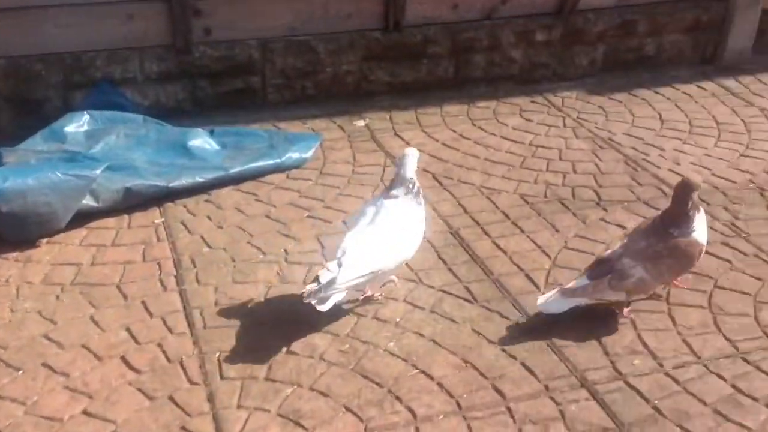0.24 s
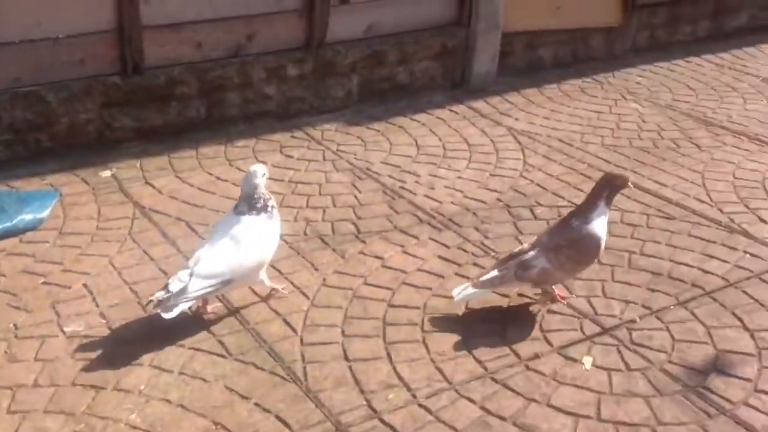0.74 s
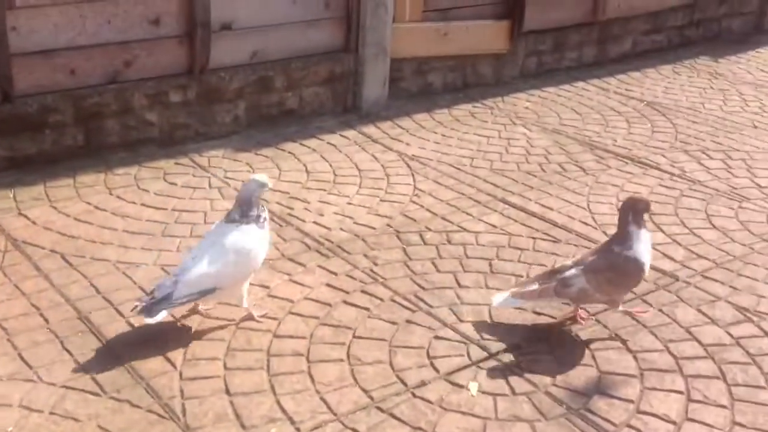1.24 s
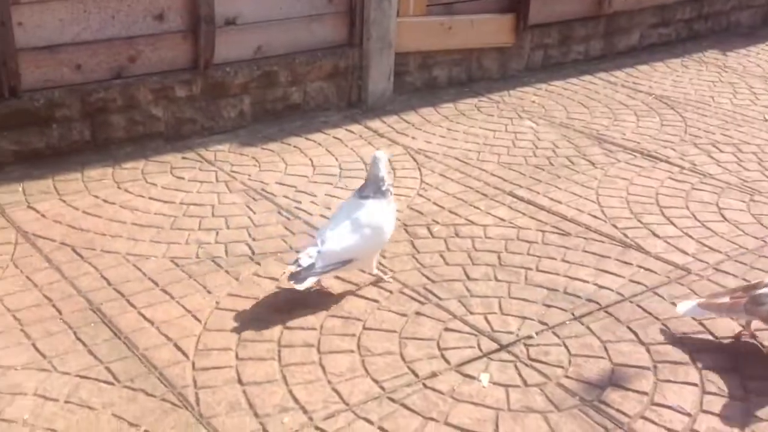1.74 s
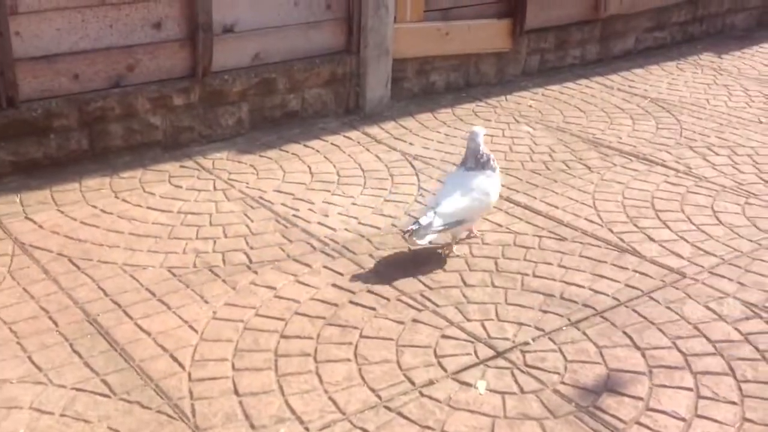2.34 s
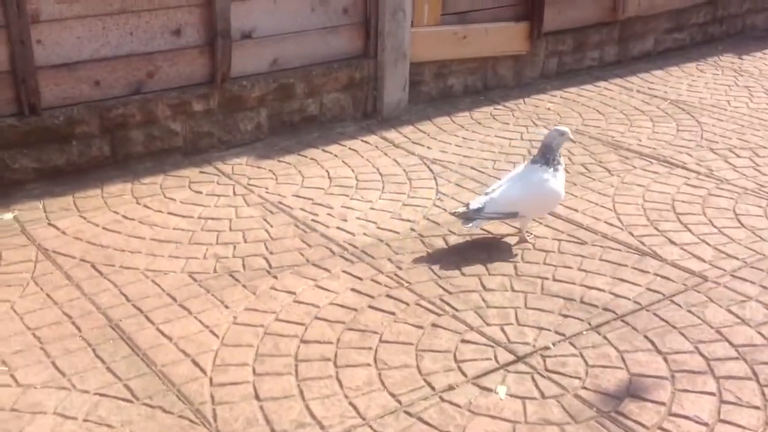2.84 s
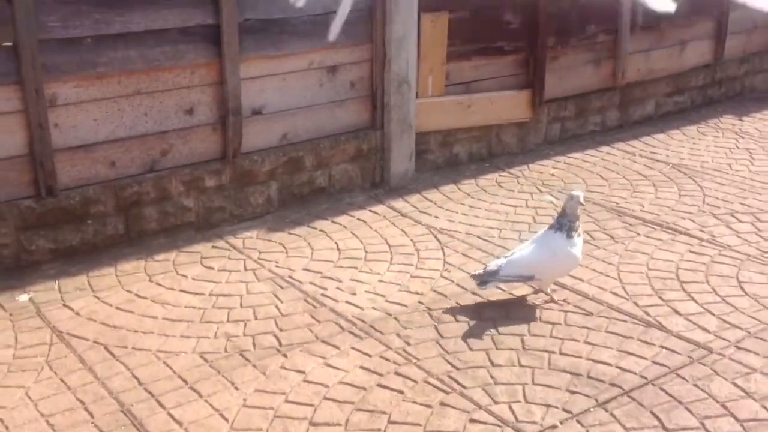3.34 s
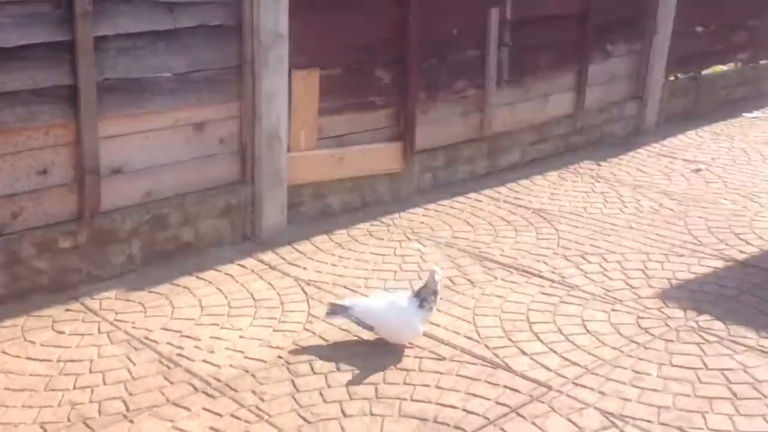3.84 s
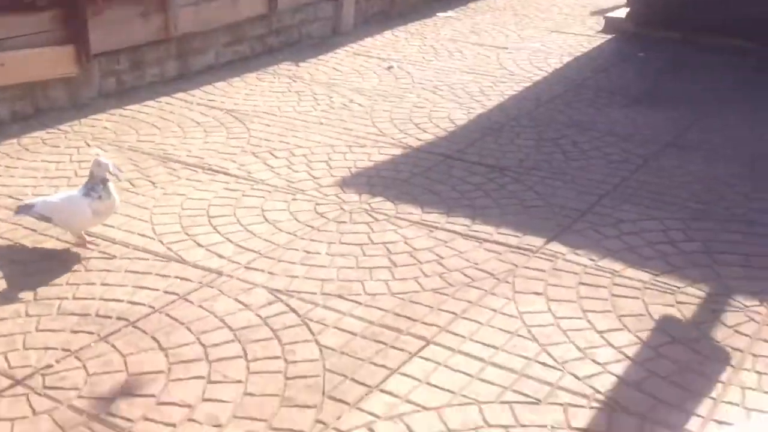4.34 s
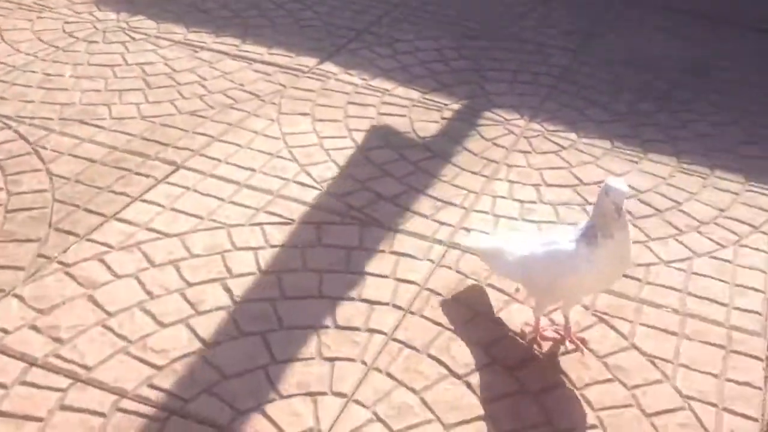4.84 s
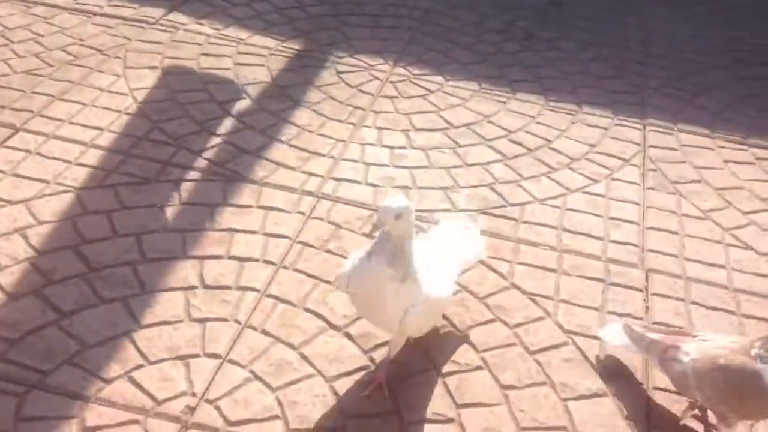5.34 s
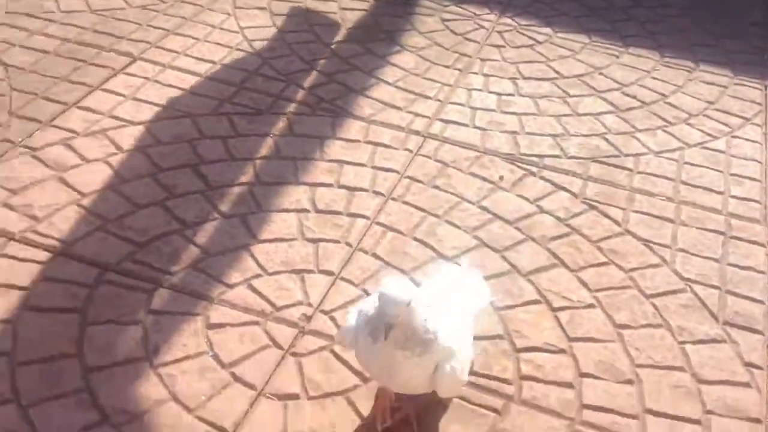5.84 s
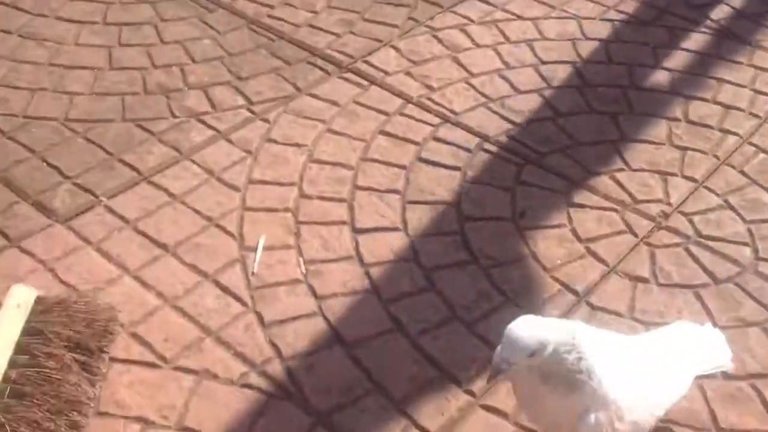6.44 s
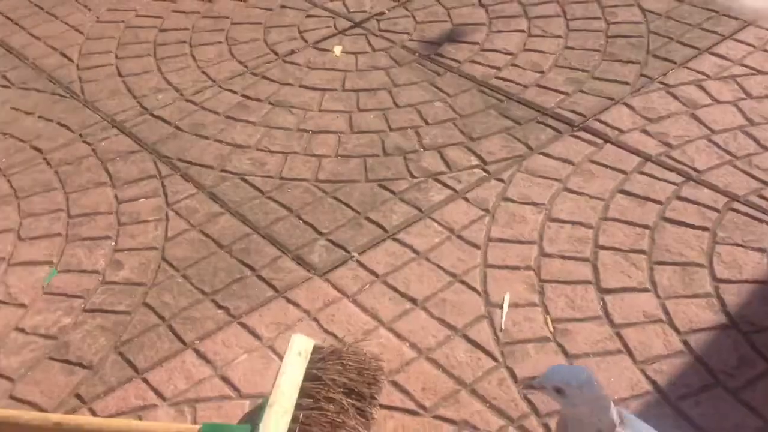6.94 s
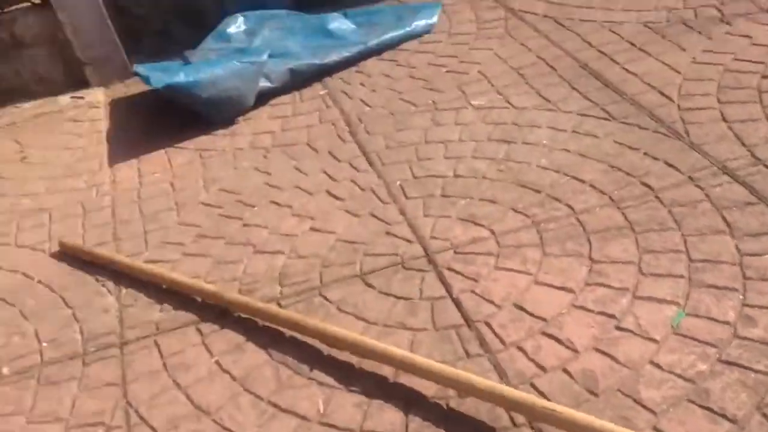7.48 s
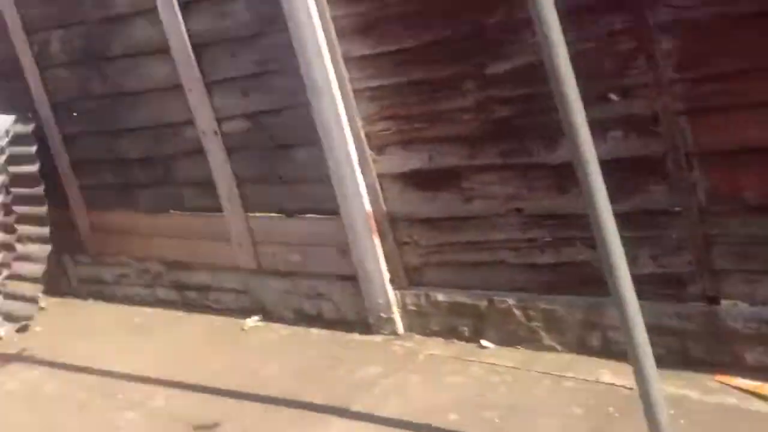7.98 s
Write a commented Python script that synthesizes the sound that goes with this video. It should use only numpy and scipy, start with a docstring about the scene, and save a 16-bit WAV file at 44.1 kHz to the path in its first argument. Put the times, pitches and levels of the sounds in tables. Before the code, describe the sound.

Low, steady traffic lies behind tiny, dry claw ticks on paving. A pigeon flaps up close, with papery slaps, breathy whistling downstrokes and soft puffs of air. After a calm gap with sparse ticks, another takes off with a scrabble, loud cracking claps and low wind thumps on the handheld microphone, then a thin wing whir and a dull wooden landing knock. Short outdoor echoes from paving and fence.

```python
"""Over far traffic hum, filtered noise, a soft swish dies away within the first second in a paved, fenced yard.
Claws tick on the paving as brief decaying sines; then pigeons fly up close to a handheld microphone.
Wings clap as noise bursts with low pops, downstrokes whistle and hiss, upstrokes push low puffs of air.
Claws tick again before a second flight, which scuffles, claps harder and later adds a fluttering wing whir.
Last, a bird's feet knock on a wooden loft, a sum of damped modes; sparse echoes follow the near sounds."""
import sys
import numpy as np
from scipy import signal
from scipy.fft import rfft, irfft
from scipy.io import wavfile
from scipy.ndimage import uniform_filter1d

SR = 44100
rng = np.random.default_rng(int(sys.argv[2]) if len(sys.argv) > 2 else 0)


def bounce(signal):
    """Save signal as a 16-bit WAV file at the path given by the first command-line argument."""
    frames = np.transpose(np.atleast_2d(signal))
    limited = np.clip(frames, -1, 1)
    pcm = np.round(limited * 32767).astype(np.int16)
    wavfile.write(sys.argv[1], SR, pcm)


N = 362061  # length [samples]

# Spectra give relative density: (frequency [Hz], level [dB per Hz]).
# Far traffic: its course (time [s], level [dB]) and its spectrum
HUM_LEVEL = [(0.0, -57), (2.52, -58), (3.84, -53.5), (4.32, -58), (5.78, -59), (6.35, -55.5), (6.97, -57.5),
             (8.21, -57.5)]
TRAFFIC_SPECTRUM = [(15, -75), (25, -44), (92, -22.5), (146, -0.5), (205, -2), (282, -2), (405, -6),
                    (485, -3), (816, -4.5), (1640, -16), (2010, -19), (3000, -37.5), (3900, -36),
                    (6600, -120)]
# Microphone hiss: spectrum, and overall level [dB]
HISS_SPECTRUM = [(1470, -27), (2500, -4), (3660, -6), (8230, -7.5), (9880, -15), (14600, -4.5),
                 (15500, -14)]
HISS_DB = -71.5
# Smooth swish further off: (time [s], level [dB]), and its spectrum
SWISH_LEVEL = [(0.0, -69.5), (0.19, -65), (0.356, -67.5), (0.508, -63), (0.73, -74), (0.95, -87)]
SWISH_SPECTRUM = [(1180, -27), (2000, -6), (2330, -5), (4790, -2), (11800, -9), (15500, -15)]
# Air from the wings buffeting the microphone, one curve per flight: (time [s], level [dB]); and its spectrum
BUFFET_LEVELS = [
    [(2.45, -79), (2.656, -57), (3.85, -75), (4.026, -56), (4.144, -82)],
    [(5.7, -67), (6.06, -48.5), (6.11, -72), (6.94, -52.5), (7.11, -57), (8.05, -73), (8.13, -60),
     (8.21, -71)],
]
BUFFET_SPECTRUM = [(20, -56), (60, -21.5), (130, -2.5), (220, -4.0), (400, -26)]
# Claws on the paving, about five steps a second: (time [s], greatest strike level [dB])
CLAW_STEPS = [(0.7083, -43), (0.7966, -50), (0.9487, -47), (1.1454, -51), (1.3613, -44), (1.575, -44),
              (1.7654, -42), (1.9639, -41), (2.135, -47), (2.2777, -43), (2.3885, -47), (4.3949, -52),
              (4.696, -39.5), (4.9192, -48), (5.366, -41.5), (5.462, -47), (5.5976, -43), (5.6206, -48)]
# Feet on the loft boards: (mode frequency [Hz], level [dB], decay by 60 dB [s])
BOARD_MODES = [(242, -35, 0.18), (354, -34, .04), (1560, -38.5, 0.036)]
KNOCK_S = 8.1675
# Feathers rustling between the beats, one curve per flight: (time [s], level [dB]); and the feather spectrum
RUSTLE_LEVELS = [
    [(2.38, -75), (2.52, -51), (3.02, -55), (4.01, -53), (4.2, -58), (4.39, -64), (4.6, -75)],
    [(5.67, -70), (5.74, -50.5), (5.88, -56), (5.97, -41.5), (6.11, -48.5), (6.14, -51.5), (6.64, -52),
     (6.94, -47), (7.37, -50), (8.03, -52), (8.21, -45)],
]
FEATHER_SPECTRUM = [(150, -20), (400, 2.5), (900, 2), (1600, -0.5), (2500, -2.5), (4700, -4.5), (7700, -3),
                    (11000, -6), (14500, -5), (15500, -1.5)]
# Pushes of air on upstrokes and on landing: (centre time [s], level [dB], mid frequency [Hz])
PUFFS = [(2.593, -44, 332), (2.715, -45.5, 344), (2.811, -47.5, 400), (2.852, -48.5, 381),
         (2.965, -47.5, 408), (3.1, -48, 359), (3.292, -49.5, 279), (3.378, -50, 367), (3.522, -48, 377),
         (3.593, -46.5, 398), (3.653, -45.5, 354), (3.778, -48.5, 330), (3.851, -41, 365),
         (3.935, -45, 334), (4.009, -50.5, 210), (4.081, -51.5, 373), (4.154, -49.5, 292),
         (5.987, -38, 333), (6.416, -47, 273), (6.511, -38.5, 313), (6.758, -40, 394), (6.823, -50, 320),
         (6.875, -37.5, 300), (6.991, -43, 350), (7.104, -43, 372), (7.22, -34, 376), (7.337, -46, 287),
         (7.588, -48, 300), (8.186, -39, 236)]
# Harder pushes are shorter: (level [dB], width at half height [ms])
PUFF_WIDTH = [(-50, 22), (-32.5, 13.17)]
# Scrabbling and fluttering on the spot, quick runs of puffs:
# (start [s], end [s], greatest level [dB], lowest mid frequency [Hz], highest mid frequency [Hz])
SCUFFLES = [(5.935, 6.098, -41, 260, 670), (8.115, 8.161, -40, 256, 470)]
SCUFFLE_GAP_S, SCUFFLE_WIDTH_MS = .009, 8.35
# Thin, fluttering wing whistle running under the late beats: (time [s], level [dB]), and its spectrum
WHIR_LEVEL = [(7.28, -73), (7.4, -62), (7.65, -56), (8.0, -63), (8.08, -62)]
WHIR_SPECTRUM = [(480, -40), (660, 3), (780, -1), (1000, -35)]
# Downstrokes: (centre time [s], whistle level [dB], reference whistle frequency [Hz],
# width of the basic swell at half height [ms], feather hiss level [dB])
STROKES = [(2.546, -48, 751, 45, -48), (2.668, -45, 773, 48, -43), (2.8, -42.5, 723, 53, -45),
           (2.937, -43, 743, 54, -43), (3.08, -41, 751, 54, -42), (3.222, -44.5, 624, 47, -43.5),
           (3.37, -44, 654, 58, -45), (3.508, -47.5, 687, 58, -44.5), (3.662, -49, 671, 44, -48),
           (3.794, -48, 680.5, 50, -50.5), (4.081, -51, 568, 44, -58), (5.771, -57.5, 733, 76, -66),
           (5.908, -52.5, 752, 35, -62), (5.993, -42, 630, 22, -43), (6.04, -52, 711, 34, -50),
           (6.085, -55, 620, 26, -53), (6.34, -58, 726, 90, -81), (6.468, -54.5, 730, 58, -63),
           (6.59, -49, 708, 38, -85), (6.716, -52, 661, 41, -48), (6.831, -47, 722, 50, -49.5),
           (6.952, -44.5, 740, 21, -47.5), (7.076, -44.5, 647, 33, -44.5), (7.185, -66, 635, 31, -44),
           (7.3, -58, 716, 40, -51), (7.41, -58, 750, 50, -60), (7.534, -49.5, 739, 43, -70),
           (7.647, -49, 684, 35, -53), (7.77, -57, 813, 51, -60), (7.898, -50.5, 692, 33, -63),
           (7.979, -54.5, 647, 70, -59), (8.11, -45.5, 656, 53, -49), (8.137, -44, 718, 46, -44)]
# Faster air whistles higher and richer: (whistle frequency [Hz], overtones against the whistle [dB])
OVERTONE_LAW = [(600, -12.5), (750, -2.5)]
# Overtones gain as hiss nears the whistle: (hiss against whistle [dB], overtone change [dB])
AIRY_LAW = [(-38, -10), (4.5, -4.5)]
WHOOSH_SPECTRUM = [(120, -44), (350, 7), (800, 1), (2200, -22.0)]
# Softens the treble of the stroke's feather hiss
STROKE_HISS_SPECTRUM = [(4000, -2.5), (15000, -13)]
# Wing tips slapping together: (time [s], nominal peak level [dB], slap length [ms],
# rattle decay by 60 dB [s], treble tilt [dB]); and the spectrum of the crack
CLAPS = [(2.4942, -34.5, 5.7, 0.1, 5), (2.6223, -32.5, 4.3, .06, -8), (2.689, -34, 3.4, 0.055, -2.5),
         (2.7439, -25.5, 7.8, .052, 2), (2.8198, -35, 4.5, .068, -1), (2.8795, -18, 7.4, .05, -0.7),
         (2.9594, -46, 5.5, .071, 10), (3.0221, -27.5, 5.1, 0.046, 5.5), (3.1675, -42, 4.5, 0.22, 4),
         (3.189, -33.5, 5.7, 0.099, -4), (3.3135, -36, 2.1, .11, 1), (3.3348, -36.5, 4.2, 0.046, 0.5),
         (3.4559, -32.5, 1.3, .14, -4.5), (3.5965, -45.5, 6.3, .13, 6.5), (3.7367, -41.5, 3.6, 0.18, 4),
         (3.764, -35.5, 3.1, 0.067, -9), (3.794, -32.5, 3.9, 0.089, -19), (3.8791, -42, 7.5, 0.07, -2),
         (4.0675, -38, 3.2, 0.12, -4), (4.138, -57, 4, .094, 8), (4.2947, -55, 2.9, 0.1, 3),
         (5.8578, -33.5, 2.8, .18, -7), (6.1654, -23.5, 9.9, 0.069, -3.5), (6.2523, -48, 7.5, .081, 8),
         (6.2975, -22, 11, 0.055, -2), (6.423, -43.5, 5, 0.3, 9), (6.5339, -20, 1.55, 0.045, 1.7),
         (6.6752, -30.5, 4.9, 0.13, -7), (6.7767, -18.5, 1.8, .084, -10), (6.8167, -28.5, 1.4, 0.12, 1.1),
         (6.8971, -22.5, 4.7, 0.065, -23), (7.018, -27, 7.2, 0.1, -6.5), (7.127, -7.5, 7.9, 0.057, -10),
         (7.2399, -7.5, 4.4, 0.041, -4), (7.3635, -27.5, 3.8, .15, -11), (7.49, -27.5, 2.6, 0.16, -14),
         (7.6033, -25.5, 6.4, 0.12, .3), (7.7204, -32, 4.3, 0.2, -2), (7.8335, -22, 5.3, 0.13, -2.2),
         (7.9555, -49, 3.6, .072, 6), (8.085, -20.5, 2.7, 0.025, -6.5)]
CRACK_SPECTRUM = [(410, -5), (700, -1), (2080, -3), (2560, -3), (3870, -4.5), (4580, 0.5), (5080, -7),
                  (5860, -1), (9850, -4.5), (14300, -7), (15500, -4.5)]
# The low pop stands out less in hard claps: (clap level [dB], pop against clap [dB])
POP_LAW = [(-47, -12), (-24.5, -16.5), (-9.5, -22)]
# The crack thins below 1.3 kHz in hard claps: (clap level [dB], low-band change [dB])
THIN_LAW = [(-23, -.3), (-11, -7)]
EDGE_HZ = 15330  # upper band limit


def gain_of(db):
    """Amplitude ratio is ten to the power of decibels over twenty."""
    return 10 ** (np.asarray(db) / 20)


def evened(x):
    """Division by the root mean square normalises power to one."""
    return x / np.sqrt(np.mean(x ** 2) + 1e-20)


def add(mix, s, sound):
    """Superposition: a sound sums into the mix from time s [s]."""
    part = mix[round(s * SR):][:len(sound)]
    part += sound[:len(part)]


def law(points, x):
    """Piecewise linear dependence of one quantity on another."""
    return np.interp(x, *np.transpose(points))


def level(tables):
    """Envelopes linear in decibels add as amplitudes; outside each curve the level is -120 dB."""
    t = np.arange(N) / SR
    return sum(gain_of(np.interp(t, *np.transpose(rows), left=-120, right=-120)) for rows in tables)


def coloured(x, spectrum):
    """Linear filtering by a spectrum joined on a log frequency axis; white noise of rms 1 keeps rms 1."""
    hz, db = np.transpose(spectrum)
    f = np.fft.rfftfreq(len(x), 1 / SR)
    response = evened(gain_of(np.interp(np.log(f + 1), np.log(hz), db)))
    return irfft(rfft(x) * response, len(x))


def wander(size, hz):
    """Twice-averaged noise is a slow random process of rms 1, changing about hz times a second."""
    span = max(int(SR / hz / 2), 1)
    once = uniform_filter1d(rng.standard_normal(size), span)
    return evened(uniform_filter1d(once, span))


def swell(ms):
    """A raised cosine gives a smooth rise and fall, ms wide at half height."""
    return np.hanning(int(ms * 2 * SR / 1000))


def hum():
    """Distant traffic is a stationary noise field whose bands drift in patches over time and frequency."""
    frames, f = N // 256 + 5, np.fft.rfftfreq(1024, 1 / SR)
    real, imaginary, patches = rng.standard_normal((frames, 513, 3)).T
    patches = uniform_filter1d(patches, 10, 0)  # across frequency
    patches = evened(uniform_filter1d(patches, 12, 1))  # across time
    hz, db = np.transpose(TRAFFIC_SPECTRUM)
    band_db = np.interp(np.log(f + 1), np.log(hz), db)[:, None]
    bins = (real + 1j * imaginary) * gain_of(band_db + 0.57 * patches)
    wash = signal.istft(bins, nperseg=1024, noverlap=768)[1][:N]
    return level([HUM_LEVEL]) * evened(wash)


def swish():
    """Filtered noise under a smooth envelope is a soft, even rush of mid treble."""
    return level([SWISH_LEVEL]) * coloured(rng.standard_normal(N), SWISH_SPECTRUM)


def buffet():
    """Air from the wings is lumpy low-frequency pressure noise at the microphone."""
    lumps = rng.standard_normal(N) * gain_of(0.77 * wander(N, 5.0))
    return level(BUFFET_LEVELS) * evened(coloured(lumps, BUFFET_SPECTRUM))


def claws():
    """Impact excites a short damped oscillation; each step is three toes touching stone a few ms apart."""
    toes, t = np.zeros(N), np.arange(60) / SR
    for s, db in CLAW_STEPS:
        for k, (late, soft) in enumerate(rng.random((3, 2))):
            add(toes, s + 0.0017 * k * (0.44 + 0.39 * late), gain_of([db - 7.4 * soft]))
    tick = np.sin(2 * np.pi * 10500 * t) * np.exp(-t / .00008)
    return signal.oaconvolve(toes, tick)[:N]


def knock():
    """A struck board responds in damped modes: a hard start and a short wooden ring."""
    out, t = np.zeros(N), np.arange(2000) / SR
    ring = sum(gain_of(db - 60 * t / t60) * np.sin(2 * np.pi * hz * t) for hz, db, t60 in BOARD_MODES)
    add(out, KNOCK_S, ring)
    return out


def feathers(envelope):
    """Friction of rubbing vanes makes noise in small uneven clumps."""
    clumps_db = 1.93 * wander(N, 74) + 0.78 * rng.standard_normal(N)
    grain = rng.standard_normal(N) * gain_of(clumps_db)
    return coloured(envelope * evened(grain), FEATHER_SPECTRUM)


def rustle():
    """Modulated friction noise fills the gaps while birds are in the air."""
    return feathers(level(RUSTLE_LEVELS) * gain_of(1.8 * wander(N, 27)))


def scuffle(start, end, db, low_hz, high_hz):
    """Repeated pushes at uneven short gaps, of random strength and pitch, returned as puff rows."""
    s = np.arange(start, end, SCUFFLE_GAP_S)
    late, soft, high = rng.random((40, 3))[:len(s)].T
    hz = low_hz + (high_hz - low_hz) * high
    return list(zip(s + SCUFFLE_GAP_S * late, db - 4.9 * soft, hz, SCUFFLE_WIDTH_MS + 0 * s))


def puffs():
    """Displaced air gives a few soft cycles of low pressure, falling in frequency."""
    out = np.zeros(N)
    rows = [(s, db, hz, law(PUFF_WIDTH, db)) for s, db, hz in PUFFS]
    for run in SCUFFLES:
        rows += scuffle(*run)
    for s, db, hz, ms in rows:
        shape = swell(ms)
        n = len(shape)
        pitch = hz * (1 - .08 * np.linspace(-1, 1, n) + .12 * wander(n, 140))
        cycles = np.cumsum(pitch) / SR + rng.random()
        push = gain_of(db + 2.8 * wander(n, 133)) * shape * np.sin(2 * np.pi * cycles)
        add(out, s - n / 2 / SR, push)
    return out


def whir():
    """Narrow-band noise near the feathers' whistle pitch, amplitude modulated in quick flutters."""
    flutter = rng.standard_normal(N) * gain_of(4.5 * wander(N, 40))
    return level([WHIR_LEVEL]) * evened(coloured(flutter, WHIR_SPECTRUM))


def strokes():
    """Airflow sets flight feathers fluttering: close, wavering, sagging whistles, overtones, whoosh and hiss."""
    tone, whoosh, hiss, flick = np.zeros((4, N))
    for s, db, hz, ms, hiss_db in STROKES:
        shape = swell(ms)
        n = len(shape)
        start = s - n / 2 / SR
        octave_db = law(OVERTONE_LAW, hz) + law(AIRY_LAW, hiss_db - db)
        pitch = hz * (1 - 0.1196 * np.linspace(-1, 1, n) + 0.0272 * wander(n, 47.5))
        # (multiple of the pitch, level against the whistle [dB])
        partials = ((1.03, -1), (.84, -7), (2.2, octave_db), (2.1, octave_db + 7.0), (3.2, octave_db - 5.0))
        for multiple, part_db in partials:
            phase = 2 * np.pi * np.cumsum(multiple * pitch * (1 + 0.0506 * wander(n, 129))) / SR
            part = evened(gain_of(3 * wander(n, 70)) * np.sin(phase))
            add(tone, start, gain_of(db + part_db) * shape ** 3.0 * part)
        add(whoosh, start, gain_of(db - 10.0) * shape)
        add(hiss, start, gain_of(hiss_db) * shape ** 1.7)
        # tips whip back, bright, as the stroke ends
        add(flick, s + 0.36 * ms / 1000, gain_of(hiss_db - 5) * swell(12.0))
    gusts = evened(rng.standard_normal(N) * gain_of(4.5 * wander(N, 83)))
    rush = coloured(whoosh * gusts, WHOOSH_SPECTRUM)
    soft_hiss = coloured(feathers(hiss), STROKE_HISS_SPECTRUM)
    return tone + rush + soft_hiss + feathers(flick)


def claps():
    """Impact in succession: feathers meet over a few ms, trapped air pops low, then the plumage rattles out."""
    dull, bright, thick, body = np.zeros((4, N))
    t = np.arange(4000) / SR
    for s, db, ms, t60, tilt_db in CLAPS:
        slap_noise, quill_noise, ring_noise = rng.standard_normal((3, len(t)))
        light = np.clip((-26 - db) / 10, 0, 1)
        rise = .0005 + .005 * light  # light touches start softly and snap less [s]
        start = s - rise - .0005
        quills = evened(slap_noise * gain_of(4.5 * (1 - light) * quill_noise))  # separate quills
        slap = np.exp(-(np.maximum(t - rise, 0) * 1000 / ms) ** 3) * quills
        rattle = gain_of(-3.0 - 60 * t / t60) * np.minimum(t / 0.00069, 1) * ring_noise
        # halved, as peaks stand twice the mean
        crack = gain_of(db) * np.minimum(t / rise, 1) * (slap + rattle) / 2
        add(dull, start, crack)
        add(bright, start, crack * (gain_of(tilt_db) - 1))
        add(thick, start, crack * (gain_of(law(THIN_LAW, db)) - 1))
        low, mid, high = 1 + .1 * np.tanh(slap_noise[:3])  # random detuning
        pop = np.sin(2 * np.pi * 300 * low * t) + np.sin(2 * np.pi * 490 * mid * t)
        pop = pop + 0.31 * np.sin(2 * np.pi * 740 * high * t)
        pop_envelope = t / 0.0018 * np.exp(1 - t / 0.0017)
        add(body, s, gain_of(db + law(POP_LAW, db)) * pop * pop_envelope)
    treble = signal.sosfiltfilt(signal.butter(1, 4500, "high", fs=SR, output="sos"), bright)
    lows = signal.sosfiltfilt(signal.butter(2, 1300, fs=SR, output="sos"), thick)
    return coloured(dull + treble + lows, CRACK_SPECTRUM) + body


def fences(x):
    """Reflection from paving, wall and fence gives sparse echoes; the treble decays fastest."""
    taps = np.zeros(SR // 2)
    at = np.arange(200, len(taps) - 20, 20)
    taps[at + rng.integers(0, 20, len(at))] = rng.choice([-1., 1.], len(at))
    hz, t, bins = signal.stft(taps, SR, nperseg=256)
    t60 = np.interp(hz, [300, 3000, 12000], [.3, .28, .2])[:, None]
    tail = signal.istft(bins * gain_of(-60 * t / t60), SR, nperseg=256)[1]
    return signal.fftconvolve(x, tail / np.linalg.norm(tail))[:N]


def scene():
    """Superposition of background, birds and their echoes in one channel."""
    # keeps the deepest bass out of the claps, strokes, puffs and knock
    high_pass = signal.butter(2, 110, "high", fs=SR, output="sos")
    near = signal.sosfilt(high_pass, claps() + strokes() + puffs() + knock())
    birds = near + claws()
    echoes = gain_of(-13.5) * fences(birds)
    return (birds + echoes + rustle() + whir() + swish() + buffet() + hum())[None]


def record(dry):
    """Transduction adds microphone hiss, then a low-pass filter limits the band."""
    heard = dry + gain_of(HISS_DB) * coloured(rng.standard_normal(N), HISS_SPECTRUM)
    low_pass = signal.firwin(511, EDGE_HZ, window=("kaiser", 6), fs=SR)
    return signal.oaconvolve(heard, low_pass[None], "same")


dry = scene()
out = record(dry)
bounce(out)
```